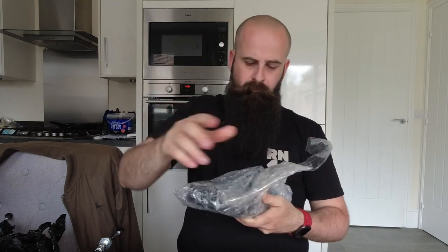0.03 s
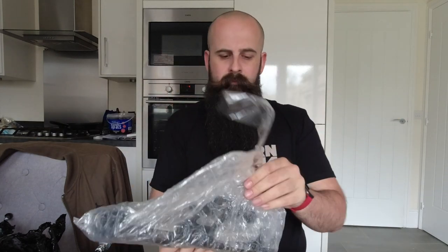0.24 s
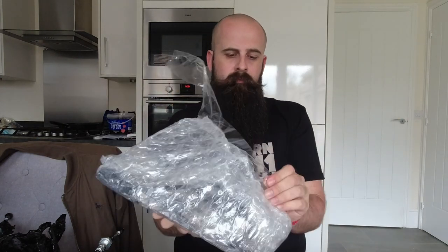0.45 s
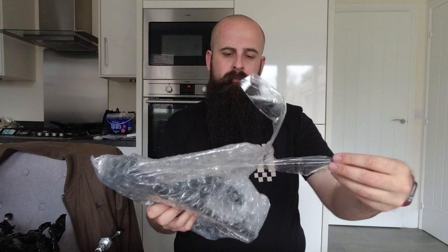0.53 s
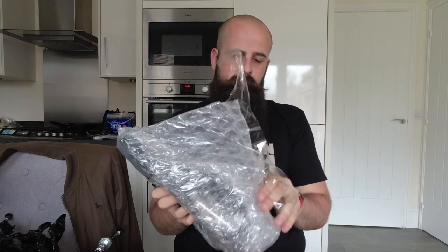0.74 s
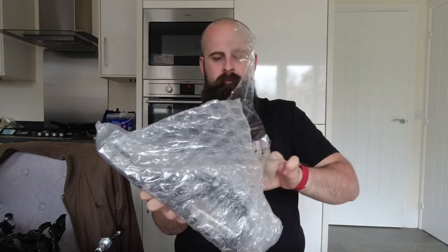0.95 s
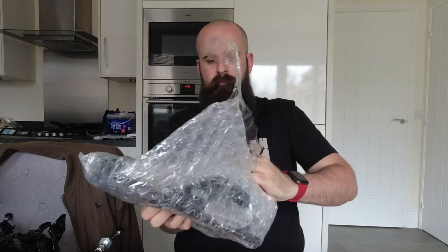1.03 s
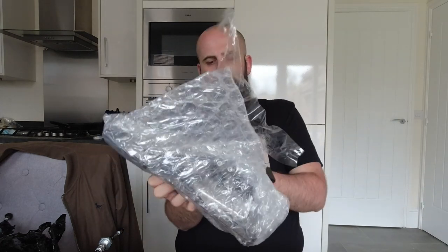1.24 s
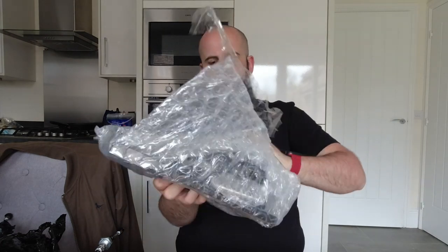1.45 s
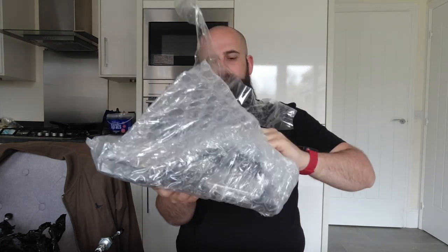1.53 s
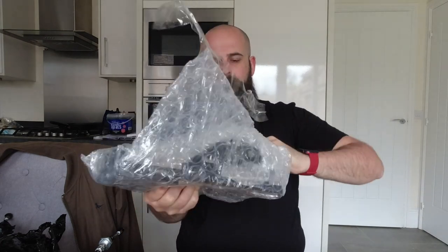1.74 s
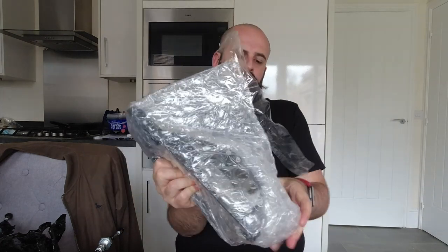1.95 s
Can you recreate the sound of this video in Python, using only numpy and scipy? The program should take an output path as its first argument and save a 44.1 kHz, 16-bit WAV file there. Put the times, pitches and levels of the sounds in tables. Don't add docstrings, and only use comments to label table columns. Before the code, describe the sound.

Bubble wrap crinkles close to a small microphone in a quiet kitchen. Sharp crackles and a thin squeak start near 0.1 s, with a bright snap at 0.2. Tape rips swiftly from 0.37 to 0.47, swelling loudest near 0.44. After a lull around 0.6, irregular dry snaps, rustling strokes and soft bumps continue, strong near 1.0, 1.2 and 1.5, with tiny squeaks at 1.5 and 1.7.

```python
import sys
import numpy as np
from scipy import signal
from scipy.fft import rfft, irfft
from scipy.io import wavfile

SR = 44100
rng = np.random.default_rng(int(sys.argv[2]) if len(sys.argv) > 2 else 0)


def level_to_linear(level):
    exponent = np.asarray(level, float) / 20
    return 10 ** exponent


def digitize_waveform(pressure):
    field = np.atleast_2d(pressure).T
    bounded = np.clip(field, -1, 1)
    quanta = np.round(bounded * 32767).astype(np.int16)
    wavfile.write(sys.argv[1], SR, quanta)


N = 88200


def rms_one(x):
    return x / np.sqrt(np.mean(x ** 2) + 1e-20)


def peak_one(x):
    return x / np.abs(x).max()


def band(x, low_hz, high_hz):
    sos = signal.butter(2, [low_hz, min(high_hz, 19000)], "band", fs=SR, output="sos")
    return signal.sosfilt(sos, x)


def colour(x, spectrum):
    size = 1024
    hz, db = np.transpose(spectrum)
    bin_hz = np.arange(size // 2 + 1) * SR / size
    log_gain = np.interp(np.log(bin_hz + 1), np.log(hz), db) * np.log(10) / 20
    cepstrum = irfft(log_gain)
    cepstrum[1:size // 2] *= 2
    cepstrum[size // 2 + 1:] = 0
    response = irfft(np.exp(rfft(cepstrum)))
    return signal.fftconvolve(x, rms_one(response) / np.sqrt(size))[:len(x)]


def ring(x, hz, t60_s):
    r, w = level_to_linear(-60 / (t60_s * SR)), 2 * np.pi * hz / SR
    return signal.lfilter([.5, 0, -.5], [1, -2 * r * np.cos(w), r * r], x + 1e-18)


def drift(rate_hz, size):
    r = np.exp(-2 * np.pi * rate_hz / SR)
    noise = rng.standard_normal(size + 4000)
    return rms_one(signal.lfilter([1], [1, -2 * r, r * r], noise)[4000:])


# freq_hz [Hz], density_db [dB per Hz]
HOUSE_HISS = [(59, -37), (100, -6.5), (213, -9), (524, -19), (6910, -22), (15000, -27)]


def room_tone():
    hiss_db, rumble_db, rumble_hz = -79, -76.5, 55
    rumble = band(rng.standard_normal(N), rumble_hz / 2, rumble_hz * 2)
    hiss = colour(rng.standard_normal(N), HOUSE_HISS)
    return level_to_linear(hiss_db) * rms_one(hiss) + level_to_linear(rumble_db) * rms_one(rumble)


# start_s [s], pitch_hz [Hz], level_db [dB]
LOW_THUMPS = [(0.21, 51, -52.5), (1.228, 57, -47), (0.13, 394, -48), (.52, 240, -52), (1.775, 53, -58),
              (0.66, 365, -46.5), (.226, 506, -47), (0.49, 370, -43.5), (0.65, 190, -58),
              (0.92, 365, -42.5), (1.22, 194, -53), (1.593, 390, -58.5)]


def bumps():
    ref_hz, ref_s = 55.6, 0.0081
    t = np.arange(N) / SR
    out = 0
    for start_s, pitch_hz, level_db in LOW_THUMPS:
        u = np.maximum(t - start_s, 0) / ref_s * np.sqrt(pitch_hz / ref_hz)
        out = out + level_to_linear(level_db) * u * np.exp(-u) * np.sin(2 * np.pi * pitch_hz * (t - start_s))
    return out


# start_s [s], length_s [s], pitch_hz [Hz], level_db [dB]
FILM_SQUEAKS = [
    (.079, 0.024, 3252, -32.5),
    (0.152, 0.05, 3260, -49.5),
    (0.206, 0.028, 3280, -43.5),
    (0.683, 0.021, 3300, -66),
    (1.473, 0.014, 3280, -30.5),
    (1.483, 0.01, 3830, -32),
    (1.737, 0.013, 3270, -35),
    (1.738, 0.014, 3980, -37.5),
]
# multiple [of the pitch], level_db [dB]
SQUEAK_HARMONICS = [(1, -8), (2, -1.5), (3, -9), (4, -17)]


def squeaks():
    wander_hz, fade_db, lumps_db = 80, 14, 5
    out = np.zeros(N + SR)
    t = np.arange(2600) / SR
    for start_s, length_s, pitch_hz, level_db in FILM_SQUEAKS:
        hz = pitch_hz + wander_hz / 2 * drift(610, len(t))
        phase = 2 * np.pi * np.cumsum(hz) / SR
        release_db = 430 * np.maximum(t - length_s, 0)
        shape = np.minimum(t / 0.0011, 1) * level_to_linear(level_db - fade_db * t / length_s - release_db)
        tone = 0
        for multiple, part_db in SQUEAK_HARMONICS:
            tone = tone + level_to_linear(part_db + lumps_db * drift(165, len(t))) * np.sin(multiple * phase)
        i = int(start_s * SR)
        out[i:i + len(t)] += shape * tone
    return out[:N]


# start_s [s], level_db [dB]
GLUE_SLIPS = [(0.374, -54), (0.3766, -49), (0.3794, -42.5), (0.3853, -38), (0.3883, -38.5), (0.3912, -45),
              (0.3926, -38), (0.3977, -34.5), (0.398, -45), (0.4019, -28.5), (0.405, -26.5),
              (0.4087, -26.5), (0.4136, -28), (0.4168, -25.5), (0.4202, -23.5), (0.426, -23.5),
              (0.4283, -21.5), (0.433, -16), (0.434, -15), (0.439, -9.5), (0.4388, -11.5), (0.4431, -15.5),
              (0.4483, -22), (0.4488, -18), (0.4528, -31), (0.455, -30), (0.4612, -28), (0.4655, -41)]
# freq_hz [Hz], density_db [dB per Hz]
TAPE_SPECTRUM = [(88, -31), (150, -35.5), (1650, -7), (2840, -6.5), (4700, 0), (15800, -2.5)]


def rip():
    rip_db, bed_db, slip_t60_s = 2, -12, 0.005
    dull_db, slack_start_s, slack_rise_s = 8, 0.4442, 0.019
    t = np.arange(N) / SR
    start_s, level_db = np.transpose(GLUE_SLIPS)
    slip_power = np.zeros(N)
    slip_power[(start_s * SR).astype(int) - 10] = level_to_linear(2 * level_db)
    decay = level_to_linear(-120 / (slip_t60_s * SR))
    slip_power = signal.lfilter([1], [1, -decay], slip_power + 1e-18)
    tearing = (t > start_s[0]) * (t < start_s[-1])
    bed = level_to_linear(bed_db + np.interp(t, start_s, level_db)) * tearing
    shape = np.sqrt(slip_power + bed ** 2)
    tear = colour(shape * rng.standard_normal(N), TAPE_SPECTRUM)
    dull = band(shape * rng.standard_normal(N), 257, 1500)
    slack = np.clip((t - slack_start_s) / slack_rise_s, 0, 1)
    return level_to_linear(rip_db) * (tear + level_to_linear(dull_db) * slack * dull)


# start_s [s], length_s [s], start_level_db [dB], end_level_db [dB]
HAND_STROKES = [(.0, 0.038, -67, -56), (0.049, 0.075, -52, -58.5), (0.132, 0.11, -54, -48),
                (0.203, 0.01, -36, -43.5), (0.253, .11, -51.5, -55.5), (0.474, 0.086, -44, -68.5),
                (0.563, 0.037, -73.5, -50.5), (.645, 0.066, -62, -58.5), (0.721, 0.071, -53, -60.5),
                (0.813, 0.19, -55, -67), (0.944, 0.047, -55, -43), (0.996, 0.048, -54.5, -47.5),
                (1.054, 0.11, -56, -57.5), (1.202, 0.058, -54.5, -44), (1.272, 0.044, -55.5, -61),
                (1.323, 0.02, -50, -58), (1.378, 0.094, -61.5, -60.5), (1.397, 0.013, -43, -39.5),
                (1.462, 0.033, -31.5, -37), (1.519, 0.02, -71, -63.5), (1.623, 0.038, -58, -39),
                (1.69, 0.021, -55.5, -37), (1.737, 0.049, -53, -44.5), (1.849, 0.15, -55.5, -50)]
# freq_hz [Hz], density_db [dB per Hz]
FILM_SPECTRUM = [(88, -56.5), (300, -19.5), (1100, -14), (3200, -7), (6450, -8), (15800, -10.5)]


def stroke_gain():
    settling_db, still_start_s, still_end_s, edge_s = -69, 0.615, 0.642, 0.0029
    t = np.arange(N) / SR
    gain = level_to_linear(settling_db) * ((t < still_start_s) | (t > still_end_s))
    for start_s, length_s, start_db, end_db in HAND_STROKES:
        rise = np.clip((t - start_s) / edge_s + 1, 0, 1)
        fall = np.exp(-np.maximum(t - start_s - length_s, 0) / edge_s)
        progress = np.clip((t - start_s) / length_s, 0, 1)
        gain = np.maximum(gain, rise * fall * level_to_linear(start_db + (end_db - start_db) * progress))
    return gain


def rustle():
    grains_per_s, spread_db, grain_cycles = 3000, 3.3, 8.0
    clump_db, hiss_db = 6, -4
    sizes = level_to_linear(spread_db * np.minimum(rng.exponential(1, N), 4)) * rng.choice([-1, 1], N)
    born = rng.random(N) < grains_per_s * level_to_linear(clump_db * drift(90, N)) / SR
    pitch_index = rng.integers(0, 16, N)
    grains = 0
    for k, hz in enumerate(np.geomspace(900, 15000, num=16)):
        ticks = ring(sizes * born * (pitch_index == k), hz, grain_cycles / hz)
        grains = grains + ticks * hz * level_to_linear(6.1 * drift(47, N))
    hiss = level_to_linear(hiss_db + clump_db * drift(176, N)) * rng.standard_normal(N)
    return stroke_gain() * rms_one(colour(rms_one(grains) + hiss, FILM_SPECTRUM))


def resonate(x, hz, near_ratio, low_ratio, high_ratio, wide_db):
    near = band(x, hz / near_ratio, hz * near_ratio)
    return near + level_to_linear(wide_db) * band(x, hz / low_ratio, hz * high_ratio)


# start_s [s], pocket_hz [Hz], knock_level_db
# [dB], crack_hz [Hz], crack_level_db [dB]
CREASES = [(0.0617, 3570, -31, 11500, -28), (0.07, 2410, -41.5, 5600, -37),
           (0.08, 5620, -26, 13100, -25), (0.0903, 2570, -33, 6000, -30),
           (0.1397, 1260, -49, 7800, -46), (0.1608, 3340, -43, 7800, -36),
           (0.1684, 4060, -43, 9500, -25.5), (0.1963, 2930, -36, 12300, -34),
           (0.1995, 3810, -26, 10800, -23), (0.202, 4060, -21.5, 10100, -14),
           (0.2276, 2120, -33.5, 7800, -31), (0.249, 2120, -38.5, 5600, -43.5),
           (0.2695, 1630, -34.5, 3800, -26.5), (0.298, 470, -43.5, 6000, -36),
           (0.3025, 2410, -49, 6400, -46), (0.3383, 3130, -36.5, 7300, -43),
           (0.3449, 1860, -45, 4300, -31.5), (0.3584, 2120, -54, 4900, -39),
           (0.4741, 1180, -36.5, 10100, -33), (0.4844, 1260, -33, 11500, -22.5),
           (0.489, 1340, -28, 6800, -25), (0.4963, 1630, -48, 9500, -48),
           (0.5211, 850, -32.5, 7300, -27), (0.5386, 1260, -45, 6400, -43),
           (0.5713, 610, -58, 12300, -41), (0.5952, 360, -47.5, 7300, -45),
           (0.6748, 2410, -55, 9500, -55),
           (0.724, 3550, -45, 11500, -34.5), (0.7518, 3810, -43.5, 8900, -48),
                (0.7752, 2770, -49, 7760, -31), (0.7968, 4730, -35.5, 10800, -37),
                (0.8166, 4330, -46, 11500, -55), (0.828, 2140, -36, 10820, -29),
                (0.8398, 2750, -42.5, 9400, -34.5), (0.8555, 2570, -53, 8900, -54),
                (0.888, 3040, -32.5, 10800, -34), (0.916, 1050, -30, 2530, -24.5),
                (0.9238, 2570, -34, 10800, -30), (0.9485, 2570, -55, 10800, -37),
                (0.9603, 4940, -38, 12300, -51), (0.9634, 2180, -27.5, 13500, -14),
                (0.9679, 3360, -26.5, 10100, -22), (0.9743, 1630, -41, 5640, -23.5),
                (0.9801, 2770, -16, 5930, -14), (1.018, 4940, -50, 11500, -32.5),
                (1.069, 3470, -42, 9500, -42), (1.1066, 4660, -36, 10500, -21.5),
                (1.1342, 5540, -20.5, 12300, -15), (1.1523, 3570, -48, 8300, -28.5),
                (1.1752, 2530, -24.5, 8800, -18.5), (1.2088, 5650, -51, 13200, -22.5),
                (1.2305, 2440, -17.5, 7700, -7.5), (1.253, 3340, -36, 12300, -23.5),
                (1.2859, 1160, -41, 8900, -34.5), (1.3079, 2140, -49, 5900, -39),
                (1.327, 2700, -34.5, 12300, -35), (1.3305, 1860, -28, 5940, -41),
                (1.342, 2120, -30, 6360, -27), (1.3494, 1950, -35, 12200, -24),
           (1.37, 2570, -42, 8300, -29), (1.3854, 2120, -58, 10900, -29),
                  (1.388, 2260, -36, 8900, -32), (1.3965, 1980, -41, 7300, -32),
                  (1.4037, 2100, -25.5, 7800, -18.5), (1.436, 4730, -36, 10800, -24.5),
                  (1.4532, 2260, -49, 7250, -33), (1.46, 1720, -21.5, 8100, -12.5),
                  (1.4741, 2150, -18.5, 7500, -14.5), (1.5227, 2570, -47, 6330, -31),
                  (1.5945, 1550, -39.5, 5600, -36.5), (1.63, 2120, -58, 6430, -24),
                  (1.6351, 3080, -28.5, 10400, -20.5), (1.6522, 1560, -30.5, 8900, -16),
                  (1.6577, 1910, -29, 12300, -30), (1.6686, 5340, -28.5, 12000, -16.5),
                  (1.7035, 1840, -26, 7250, -17), (1.7056, 2700, -21.5, 7700, -16),
                  (1.7393, 2750, -52, 6700, -24), (1.758, 2250, -32, 5400, -37),
                  (1.7699, 2430, -38, 8900, -29), (1.7789, 1370, -30.5, 6000, -25.5),
                  (1.8161, 2140, -46.5, 6400, -49), (1.8257, 1090, -32, 5030, -27.5),
                  (1.8571, 810, -47.5, 1900, -44.5), (1.8786, 3340, -44, 7800, -51.5),
                  (1.8994, 3570, -50, 8400, -44), (1.9107, 2130, -40, 9900, -25),
                  (1.9395, 1880, -41.5, 6750, -31), (1.9467, 3770, -49, 9600, -15.5),
                  (1.9677, 3130, -58, 7700, -18.5), (1.9961, 2870, -36, 6330, -19)]


def snaps():
    crack_t60_s, click_db = 0.002, 8
    echo_db, echo_knock_db, echo_lumps_db = -23, 4, 2.5
    echo_t60_s, echo_wait_s = 0.057, 0.00036
    out = np.zeros(N + SR)
    t = np.arange(2600) / SR
    for start_s, pocket_hz, knock_db, crack_hz, crack_db in CREASES:
        noise = rng.standard_normal((2, len(t)))
        burst = noise[0] * level_to_linear(-60 * t / crack_t60_s) + level_to_linear(click_db) * (t == 0)
        echo_level_db = echo_db - 60 * t / echo_t60_s + echo_lumps_db * drift(500, len(t))
        echoes = noise[1] * level_to_linear(echo_level_db) * (1 - np.exp(-t / echo_wait_s))
        x = np.array([burst, echoes, noise[1]])
        knock = resonate(x, pocket_hz, 1.35, 2.55, 2, wide_db=-9)
        crack = resonate(x, crack_hz, 1.35, 2.5, 2.3, wide_db=-10)
        direct = level_to_linear(knock_db) * peak_one(knock[0]) + level_to_linear(crack_db) * peak_one(crack[0])
        knock_tail = level_to_linear(knock_db + echo_knock_db) * knock[1] / knock[2].std()
        crack_tail = level_to_linear(crack_db) * crack[1] / crack[2].std()
        i = int(start_s * SR) - np.argmax(np.abs(direct))
        out[i:i + len(t)] += direct + knock_tail + crack_tail
    return out[:N]


def scene():
    return (room_tone() + bumps() + squeaks() + rip() + rustle() + snaps())[None]


def top_cut(x):
    return signal.sosfilt(signal.butter(12, 17000, fs=SR, output="sos"), x)


def record(dry):
    rounded = .5 * np.tanh(2 * dry)
    low_pass = signal.cheby2(10, 60, 16960, fs=SR, output="sos")
    finished = signal.sosfilt(low_pass, rounded)
    return top_cut(finished)


dry = scene()
out = record(dry)
digitize_waveform(out)
```